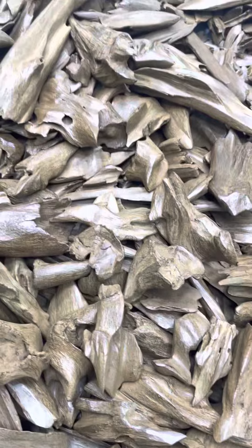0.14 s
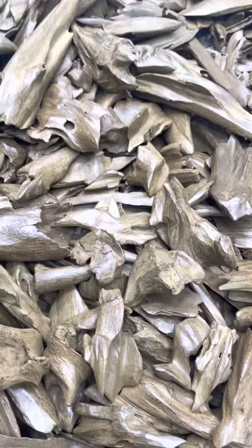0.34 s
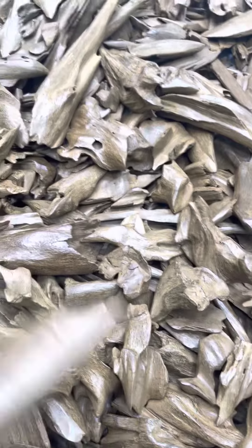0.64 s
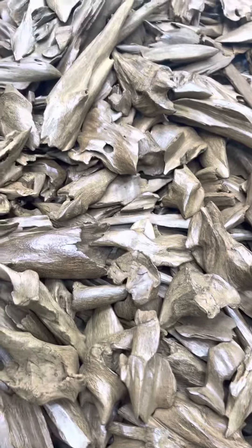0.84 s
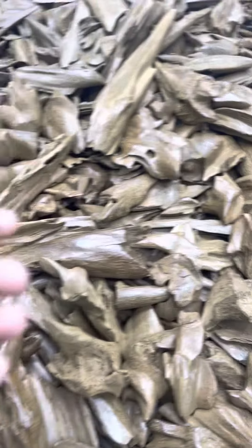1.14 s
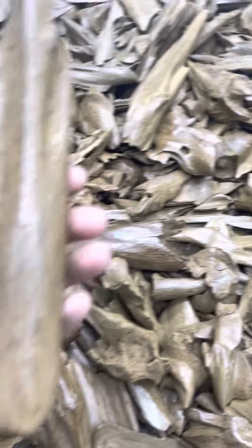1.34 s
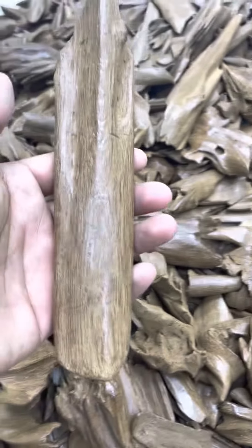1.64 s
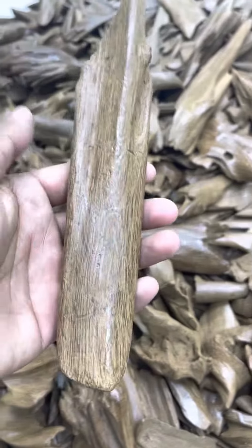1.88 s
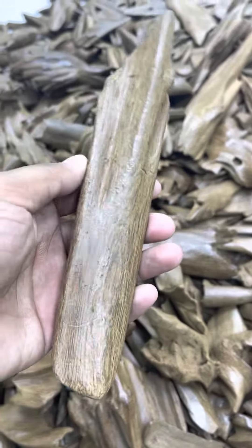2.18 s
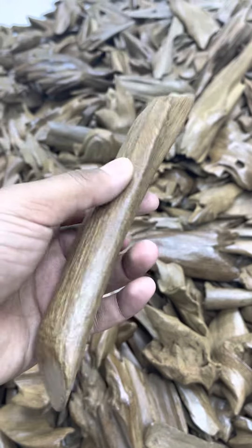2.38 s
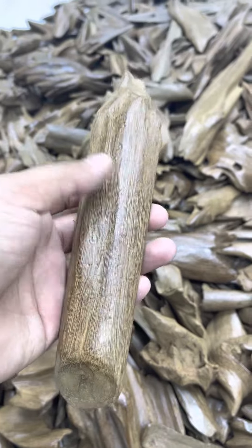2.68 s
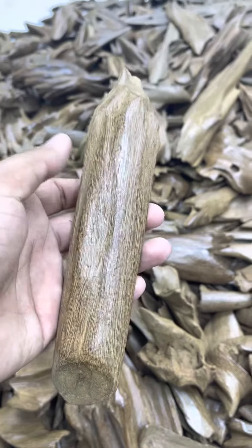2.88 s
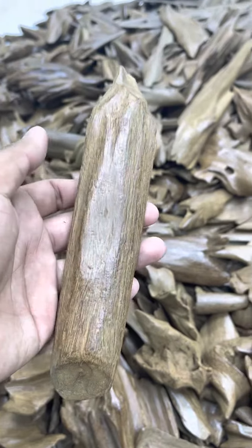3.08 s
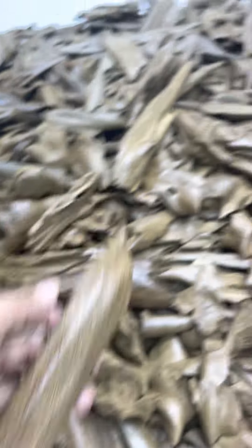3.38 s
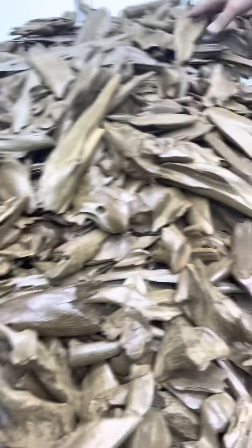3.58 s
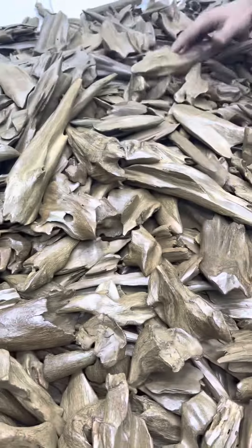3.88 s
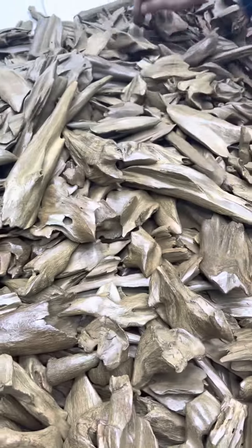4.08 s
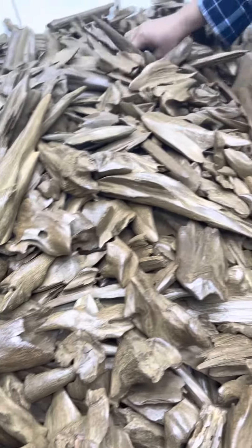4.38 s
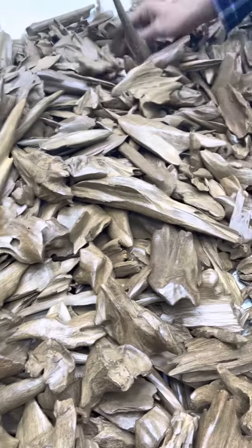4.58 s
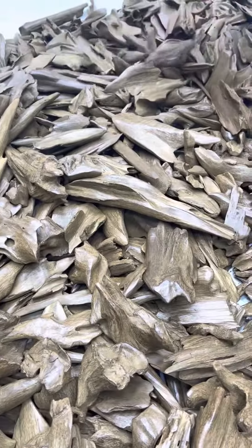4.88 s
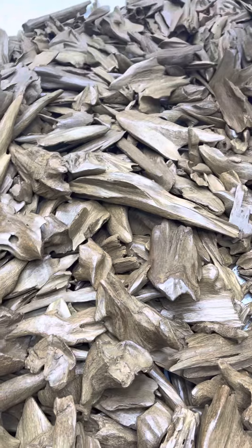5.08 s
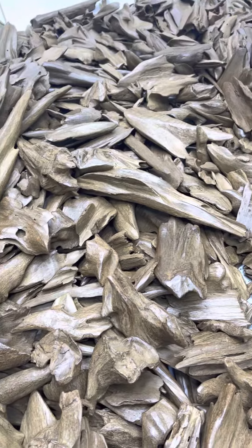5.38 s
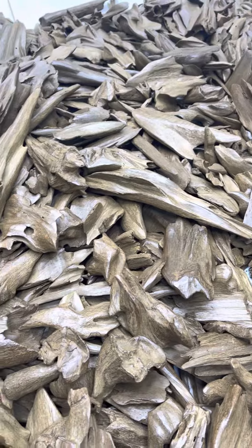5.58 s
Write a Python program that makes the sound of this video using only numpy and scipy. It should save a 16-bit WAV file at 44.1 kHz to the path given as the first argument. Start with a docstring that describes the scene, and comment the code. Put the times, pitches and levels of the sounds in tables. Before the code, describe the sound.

Close indoor handling of dry wood chunks: faint rustling first, then busier clatter, a heavy piece dropped, bright splinter ticks, and sparser knocks.

```python
"""A large heap of dry wood chips, rummaged by hand indoors, close to a pair of microphone ports.
Single pieces clack in three noise registers plus stick modes; a heavy piece drops, bounces and is choked.
With each stroke clicks ring as tumbling chips, catch-and-slip noise scrapes, splinters flick, a stick drags.
Nearest the ports the hand rustles and thumps in the bass as it turns a piece.
Behind it lie low room noise, a wavering hum and a faint diffuse tail."""
import sys
import numpy as np
from scipy import signal
from scipy.fft import rfft, irfft
from scipy.io import wavfile

SR = 44100
rng = np.random.default_rng(int(sys.argv[2]) if len(sys.argv) > 2 else 0)


def unload_wav(signal):
    """Save mono or channel-first audio to the path in sys.argv[1] as 16-bit WAV at rate SR, clipped to [-1, 1]."""
    wavfile.write(
        sys.argv[1],
        SR,
        np.round(np.clip(np.atleast_2d(signal).T, -1, 1) * 32767).astype(np.int16),
    )


N = 252693
TIME, HZ = np.arange(N) / SR, np.fft.rfftfreq(N, 1 / SR)

# Room noise of the quiet interior: [f/Hz, level/dB per Hz]
AIR_SPECTRUM = [(20, 0), (42, 1.5), (70, -3), (120, -2.5), (200, -7.5), (400, -12), (1000, -15.5),
                (4000, -48), (11000, -22.5), (14000, -125)]
# Hum filling the room: [f/Hz, level/dB]
HUM_TONES = [(66, -56.5), (99, -57.5)]
# Reverberation of the room: [f/Hz, t60/s]
ROOM_DECAY = [(200, 0.31), (1500, 0.9), (5000, 0.46), (12000, 0.019)]

# Low rustle of the hand, strongest while it turns a piece close by: [t/s, level/dB]
HAND_LEVEL = [(0, -55), (.5, -52.5), (1.3, -52), (1.6, -49.5), (2.5, -46), (2.9, -54.5), (3.6, -61),
              (5.1, -58), (5.45, -53.5), (5.7, -51)]
# Colour of that rustle: [f/Hz, level/dB per Hz]
HAND_SPECTRUM = [(50, 4), (100, 2), (180, 7.5), (300, 1), (600, -9.5), (2000, -45)]
# Soft thumps as the hand shifts its grip: [t/s, level/dB, starting pitch f/Hz, length/s]
GRIP_THUMPS = [(2.406, -34.5, 120.4, 0.047), (2.474, -40, 104.8, 0.045), (2.549, -39.5, 71, 0.072),
               (2.623, -48, 97, 0.04), (2.696, -49, 67, 0.08), (2.835, -52, 68.5, 0.043)]

# Strokes of the hand through the heap, before build-up and easing:
# [start t/s, length/s, tumbling level/dB, scraping above tumbling/dB]
HAND_STROKES = [(0.117, 0.23, -49.5, -14), (0.227, 0.33, -52, -0.5), (0.31, 0.66, -44, -6),
                (0.808, 0.19, -40.5, -5.5), (1.33, 0.14, -54.5, 11), (1.165, 0.056, -42.5, -1.5),
                (1.421, 0.11, -34.5, 0), (1.556, 0.1, -42, 1.5), (1.726, 0.13, -35, 1.5),
                (1.858, 0.41, -29.5, 4.5), (2.26, 0.1, -36.5, 4.5), (2.41, 0.5, -38, 2.5),
                (2.923, 0.054, -35, -1), (3.027, 0.28, -40, 7.5), (3.554, 0.17, -29, -1.5),
                (3.77, 0.2, -34.5, -0.5), (4.005, 0.44, -35.5, 0.5), (4.241, 0.1, -35.5, 6.5),
                (4.42, 0.22, -37, 0), (4.663, 0.081, -36.5, -0.5), (4.85, 0.064, -38, 0.5),
                (4.9, 0.015, -33.5, -6.5), (5.252, 0.028, -50, 6), (5.615, 0.17, -40, -5)]
# Many small chips knocking together: [f/Hz, level/dB per Hz]
TUMBLE_SPECTRUM = [(100, -44), (300, 0.5), (600, -4), (1000, -1), (1400, 0.5), (1900, 1), (2600, 1),
                   (3500, -13), (5000, -14.5), (9000, -16), (14000, -67)]
# Rough faces rubbing: [f/Hz, level/dB per Hz]
SCRAPE_SPECTRUM = [(100, -20), (300, -13), (800, 2.5), (1500, -0.5), (3000, 3.5), (4200, 1.5), (5200, -3.5),
                   (7500, -5.5), (10200, -9), (11500, -12), (13000, -46), (16000, -48)]
# Splinters flicked by the scraping: [f/Hz, level/dB per Hz]
SPLINTER_SPECTRUM = [(2000, -33), (4300, -6), (6000, 2.5), (8000, 3), (10200, 3.5), (11500, -12),
                     (13000, -47), (16000, -50)]
# Splinter treble against the scraping, before a fixed trim, dull when the hand digs at the far side
# of the heap: [t/s, level/dB]
SPLINTER_TREBLE = [(0, 7), (1.5, -6), (2.3, 0), (3.6, -3), (4.2, 1.5), (4.55, -5.5), (5.7, -3)]
# Single thin splinters that catch and flick free: [t/s, level/dB]
SPLINTER_FLICKS = [(.2515, -40), (1.1738, -38.5), (1.182, -43), (1.2034, -33.5), (1.215, -39), (1.229, -36),
                   (2.4957, -26), (2.509, -24), (2.61, -30), (2.654, -32), (2.761, -28), (3.231, -29),
                   (3.281, -21), (3.644, -34), (4.064, -21), (4.0755, -19.5), (4.103, -28), (4.1188, -12),
                   (4.152, -21.5), (4.2082, -23), (4.2802, -25), (5.1, -41), (5.503, -41)]
# Colour of those single flicks: [f/Hz, level/dB per Hz]
FLICK_SPECTRUM = [(3000, -43), (6000, 2.5), (11000, 3.5), (12700, -23), (15000, -32)]
# Sticks dragged over their neighbours until they ring: [start t/s, length/s, level/dB, ring pitch f/Hz]
STICK_DRAGS = [(.36, 0.18, -49, 1250), (0.922, 0.087, -46, 2096), (3.098, 0.13, -41, 2013),
               (3.838, 0.16, -37, 3030), (4.343, 0.2, -39.5, 1678), (4.552, 0.075, -36.5, 2334),
               (4.589, 0.055, -37, 1298), (4.61, 0.14, -42, 1672), (4.88, .075, -40, 1308),
               (4.957, .1, -39, 941), (5.152, .045, -47, 950)]
# Modes of a stick: [multiple of its ring pitch, level/dB, factor on t60]
STICK_MODES = [(1.002, 3.5, 1), (1.03, -26, 0.31), (1.585, -14, 0.77), (2.66, -6.5, 0.23), (3.14, -45, 0.3)]

# The heavy piece touches, lands and bounces: [t/s, level/dB, factor on t60, tilt/dB per octave]
HEAVY_CONTACTS = [(3.5295, -29, 0.3, 0), (3.5392, -3.5, 0.8, 0), (3.5615, -2, 0.45, -1.5),
                  (3.5654, -4, 0.17, -3)]
# Its modes, before tilt and factor on t60: [f/Hz, level/dB, t60/s]
HEAVY_MODES = [(390, -28, 0.02), (700, 0.5, 0.015), (980, -9, 0.018), (1576, 0, 0.022), (1786, -6.5, 0.09),
               (2880, -2.5, 0.034), (3900, -20.5, 0.13), (5200, -18, 0.03), (5970, -12, 0.022),
               (7100, -7, 0.015), (8150, -12, 0.035), (10000, -4.5, 0.0087)]

# Clear clacks, before the trims of each register and of the stick modes:
# [t/s, strength level/dB, sharpness/dB (thin edge high, flat face low), burst decay/s,
#  ring above strength/dB, ring pitch f/Hz, ring t60/s]
CLEAR_CLACKS = [(0.364, -37.5, -19, 0.0025, -5, 2300, 0.06), (0.4458, -43.5, 2, 0.008, 0, 1230, 0.052),
                (0.5132, -35.5, -13, 0.002, 15, 1360, 0.01), (0.5752, -45.5, 1, 0.014, 2, 2230, 0.052),
                (0.7012, -51.5, -27, 0.0035, 17, 1980, 0.029), (0.7676, -47, -28, 0.023, 4, 2070, 0.036),
                (0.832, -38, -12, 0.013, -1, 1630, 0.02), (0.905, -36, -4.5, .0015, 2, 4000, 0.02),
                (0.9292, -42, -10, .003, 1, 1760, .03), (1.0167, -46.5, -23, 0.0026, 7.5, 1860, .04),
                (1.067, -40, -7, 0.0041, 2, 2220, 0.027), (1.082, -36.5, -9, 0.0013, -1, 2480, 0.026),
                (1.251, -43, 12, 0.0034, -2, 6360, .02), (1.269, -41, 4, 0.01, 0, 2500, .02),
                (1.4422, -39, -1, 0.0045, 7, 3320, 0.022), (1.7878, -31, 2.5, 0.0041, 3.5, 2896, 0.028),
                (1.9256, -29, 6.5, 0.015, 2, 2770, 0.029), (1.9633, -30, -4, .003, 5, 3600, 0.028),
                (2.2914, -32.5, 12, 0.0058, -2, 1290, 0.04), (2.592, -38, 9, 0.0034, 11.5, 6480, 0.027),
                (2.6224, -29.5, -6, 0.001, 6, 1710, 0.01), (2.674, -37, -10, .003, 5, 2900, .02),
                (2.7368, -27.5, 2, 0.0069, 1, 1670, 0.029), (2.8495, -28.5, -3.5, 0.0084, 3, 1620, 0.028),
                (2.884, -36, -10, 0.0076, 12, 1690, 0.021), (2.9565, -27, -5.5, 0.0033, 5.5, 1030, 0.017),
                (3.0095, -33.5, 2.5, 0.03, 2, 2800, .02), (3.082, -34, 1, 0.0067, 2, 910, 0.018),
                (3.0878, -28, -11, 0.0054, -1, 2010, 0.06), (3.0983, -22, 0.5, 0.0055, 3.5, 5960, 0.025),
                (3.1291, -26, 3, 0.023, -1.5, 2750, 0.07), (3.2192, -24, -2, 0.014, -6, 2680, .025),
                (3.232, -31, 0, 0.005, 6, 6150, .02), (3.2751, -26.5, 4.5, 0.0077, -13, 5970, 0.027),
                (3.563, -26.5, -3, 0.0058, 7, 2290, 0.044), (3.581, -32, 3, 0.0033, -6, 6960, .02),
                (3.616, -33, 4, 0.0065, 5, 6940, 0.03), (3.6296, -23.5, -14, 0.0069, -5, 1790, 0.031),
                (3.642, -27.5, 8, 0.0049, -4, 1800, .022), (3.6832, -25, -1.5, 0.0062, 4, 2380, 0.019),
                (3.7842, -31.5, -13, 0.017, 1.5, 2660, 0.068), (3.798, -26, -9, 0.011, 2.5, 1995, 0.032),
                (3.8424, -38, -13, 0.0044, 9, 3100, 0.038), (3.8702, -38, -10, 0.0046, 12, 2920, 0.026),
                (3.885, -30, 6.5, 0.0078, 4, 3270, 0.026), (3.896, -29.5, 5, 0.0045, -3, 3940, 0.049),
                (4.0393, -31, 7.5, 0.0035, -5, 1980, 0.055), (4.097, -33, 6, 0.0033, 1, 1570, 0.028),
                (4.1026, -34, 2, 0.0029, 4, 2230, 0.026), (4.119, -26.5, 10.5, 0.0049, -4.5, 6030, 0.032),
                (4.159, -33.5, -1, 0.0031, 10, 1770, 0.097), (4.2004, -30.5, -5, 0.0088, 2, 1777, 0.089),
                (4.29, -25, 1, 0.0099, -2.5, 3690, 0.045), (4.3058, -23, -2, 0.0024, -1, 2680, .02),
                (4.3255, -23, 1.5, 0.011, -9.5, 1629, 0.21), (4.344, -28, -9, 0.0055, -13, 1670, .03),
                (4.524, -30, -8, 0.0026, 1.5, 2310, 0.083), (4.5935, -30.5, 8, 0.0046, 0, 2200, .04),
                (4.6412, -31.5, -2, 0.0079, 2.5, 3510, 0.045), (4.7142, -30, 0.5, 0.0036, -9, 2270, .03),
                (4.7344, -34, 2, .004, -3, 4040, 0.052), (4.759, -34.5, -8, 0.013, -1, 2600, 0.033),
                (4.837, -31.5, 4, 0.0029, -6, 2700, .015), (4.8677, -36.5, -29, 0.006, -4, 1298, 0.14),
                (5.0054, -33.5, -13, 0.0011, 6.5, 2880, 0.018), (5.029, -39, -10, 0.003, 4, 2920, 0.04),
                (5.07, -51, -28, .004, -21, 2170, 0.034), (5.153, -45, 8, 0.0041, 0, 3040, 0.044),
                (5.168, -53, -22, 0.0024, 16, 2950, .03), (5.199, -50.5, -31, 0.0016, 15.5, 950, 0.017),
                (5.32, -44.5, -22, .005, 6.5, 1940, 0.043), (5.3301, -37, -16, 0.0045, 1, 2310, 0.051),
                (5.366, -42, 2, 0.0035, 4, 650, 0.022), (5.3894, -31.5, -5, 0.0038, -3, 2540, 0.016),
                (5.422, -40, -2, 0.0045, 4, 690, 0.018), (5.4281, -25.5, -6, 0.0046, -4.5, 2245, 0.033),
                (5.4491, -29, -14.5, 0.0045, -10, 3400, .013),
                (5.473, -34.5, -5.5, 0.0062, 0.5, 650, 0.023), (5.509, -40.5, -22, 0.0028, 4, 1760, 0.017),
                (5.5228, -36, -10, 0.0074, -1.5, 700, 0.037), (5.632, -40, -6, .003, -2, 2020, .02),
                (5.6607, -37.5, -0.5, 0.0033, 5, 1935, .034), (5.6708, -40.5, -38, 0.0025, 11, 725, 0.024),
                (5.713, -35.5, -11, 0.0088, 0, 677, 0.04)]
# Push on the heap: [f/Hz, level/dB per Hz]
THUD_SPECTRUM = [(60, -23), (200, -9), (430, -2), (720, 7), (1100, 5), (1700, 6), (4000, -51)]
# Crack of the wood: [f/Hz, level/dB per Hz]
CRACK_SPECTRUM = [(500, -37), (1100, -4.5), (1700, -1.5), (2700, 6), (4200, 2), (5500, -4), (12000, -81)]
# Snap of thin edges: [f/Hz, level/dB per Hz]
SNAP_SPECTRUM = [(2000, -54), (4300, -1), (6000, -0.5), (8000, 2.5), (10200, 2), (11800, -18), (13000, -45),
                 (16000, -43)]

# Likeness of the two microphone ports: [f/Hz, likeness from 0 to 1]
PORT_LIKENESS = [(100, 1), (400, 0.97), (800, 0.61), (1300, 0.76), (1800, 1), (2400, 0.64), (3100, 0.11),
                 (3900, 0.77), (5000, 0.8), (6000, 0.98), (7200, 0.84), (9200, 1), (11000, 0.76)]
# Phase by which the left port leads, before it fades out in the bass: [f/Hz, lead/rad]
PORT_LEAD = [(300, -.1), (800, -.25), (1500, 0), (2200, .2), (2600, .9), (4100, .95), (4650, 2.3),
             (5250, 5.1), (5700, 6.2), (6200, 6.4), (8500, 9.3), (9600, 9.5), (11800, 12.5)]

HUM_WAVER = 0.4  # rms share by which the hum swells and sinks
# A stroke builds up, eases off as the chips give way, then the heap settles.
PUSH_S, EASE_DB_PER_S, SETTLE_DB_PER_S = 0.096, 7.5, 69
CREEP_DB, CREEP_SCRAPE_DB = -91, -62.5  # chips creep faintly between strokes
DRAG_RING_CYCLES = 115  # cycles for a 60 dB fall, before each mode's factor
THUD_PER_SHARP = 0.55  # dB of thud lost per dB of sharpness: a thin edge pushes the heap less
# Ports: bass heard in step, lower and upper roll-off, band limit
MONO_HZ, LOW_HZ, TOP_HZ, EDGE_HZ = 400, 35, 13400, 15600


def gain_of(db):
    """Decibels to amplitude."""
    return 10 ** (np.asarray(db) / 20)


def evened(x):
    """Scales to an rms of one."""
    return x / np.sqrt(np.mean(x ** 2) + 1e-20)


def read(points, hz):
    """Reads a table on a log-frequency axis."""
    f, value = np.transpose(points)
    return np.interp(np.log(hz + 1), np.log(f + 1), value)


def follow(rows):
    """Each column of a curve, at every sample."""
    s, *columns = np.transpose(rows)
    return [np.interp(TIME, s, column) for column in columns]


def add(mix, s, sound):
    """Mixes a sound in at a time in seconds."""
    part = mix[:, max(round(s * SR), 0):][:, :sound.shape[-1]]
    part += sound[..., :part.shape[1]]


def waver(rate_hz):
    """Slow chance with an rms of one."""
    return evened(irfft(rfft(rng.standard_normal(N)) * np.exp(-(HZ / rate_hz) ** 2), N))


def colour(pair, spectrum):
    """Gives two unrelated signals a spectrum and the likeness of the two ports."""
    common, apart = rfft(pair) * gain_of(read(spectrum, HZ))
    same = np.clip(read(PORT_LIKENESS, HZ), 0, 1)
    mid = common * np.sqrt(1 + same)
    side = apart * np.sqrt(1 - same)
    return evened(irfft([mid + side, mid - side], N))


def noise(spectrum):
    """Steady noise at both ports."""
    return colour(rng.standard_normal((2, N)), spectrum)


def contacts(per_s, spread_db):
    """Random clicks as surfaces touch: many small, a few large unless the spread is zero."""
    size = gain_of(spread_db * np.minimum(rng.exponential(1, N), 3.5))
    return size * (rng.random(N) < per_s / SR)


def chips(hits, low_hz, high_hz, t60, tick, count=40):
    """Shares clicks among many chips; each ticks and rings for a moment at four pitches of its own."""
    chip, t = rng.integers(0, count, N), np.arange(SR // 8) / SR
    out = np.zeros((2, N))
    pitches = rng.permutation(np.linspace(low_hz, high_hz, 4 * count)).reshape(count, 4)
    ring_times = t60 * rng.uniform(.5, 1.6, count)
    for k, (modes, lasting) in enumerate(zip(pitches, ring_times)):
        ring = 0
        for hz in modes:
            phase = rng.uniform(0, 2 * np.pi, (2, 1))
            ring = ring + np.sin(2 * np.pi * hz * t + phase)
        ring = ring * gain_of(-60 * t / lasting)
        crack = rng.standard_normal((2, len(t))) * np.exp(-t / 0.0015)
        one_chip = evened(ring) + tick * evened(crack)
        own_hits = hits * (chip == k)
        out += signal.oaconvolve(own_hits[None], one_chip, axes=1)[:, :N]
    return out


def background(air_db=-49):
    """Low room noise behind the heap, and hum tones that waver in level and phase."""
    hum = 0
    for hz, db in HUM_TONES:
        drift = waver(5.1)
        tone = (1 + HUM_WAVER * drift) * np.sin(2 * np.pi * hz * TIME + drift)
        hum = hum + gain_of(db) * evened(tone)
    return gain_of(air_db) * noise(AIR_SPECTRUM) + hum


def room(x, wet_db=-15):
    """A faint diffuse tail whose treble dies first: noise decaying band by band."""
    burst = noise([(100, 0), (12000, 0)])[:, :SR // 2]
    hz, t, z = signal.stft(burst, SR, nperseg=256)
    decay = gain_of(-60 * t / read(ROOM_DECAY, hz)[:, None])
    z = z * decay * (1 - np.exp(-t / 0.0019))  # the tail builds up softly
    tail = signal.istft(z, SR, nperseg=256)[1]
    tail = tail / np.linalg.norm(tail[0])
    return gain_of(wet_db) * signal.fftconvolve(x.mean(0)[None], tail, axes=1)[:, :N]


def rustle():
    """The hand's low rustle close to the ports: bass-heavy noise that follows its handling."""
    return gain_of(follow(HAND_LEVEL)[0]) * noise(HAND_SPECTRUM)


def thumps(sag_per_s=2.0, rough=0.33):
    """Soft, uneven low bumps as the hand shifts its grip; each swells, sags in pitch and dies."""
    out, t = np.zeros((2, N)), np.arange(SR // 3) / SR
    for s, db, hz, length in GRIP_THUMPS:
        wobble = rough * waver(70)[:len(t)]
        drift = rough * waver(70)[:len(t)]
        u = (2 * t / length) ** 2
        swell = np.sqrt(2 * u) * np.exp(1 - np.sqrt(u))  # fullest at half the length
        turns = np.cumsum(hz * np.exp(-sag_per_s * t)) / SR
        tone = np.sin(2 * np.pi * turns + drift)
        add(out, s, gain_of(db) * swell * (1 + wobble) * tone)
    return out


def motion(start, length, db):
    """Amplitude of one stroke: it builds up, eases off and dies away."""
    t = np.maximum(TIME - start, 0)
    settling = SETTLE_DB_PER_S * np.maximum(t - length, 0)
    return np.minimum(t / PUSH_S, 1) * gain_of(db - EASE_DB_PER_S * t - settling)


def strokes():
    """Levels in dB of tumbling and of scraping, powers summed over all strokes."""
    tumble, scrape = gain_of(CREEP_DB) ** 2, gain_of(CREEP_SCRAPE_DB) ** 2
    for start, length, db, scrape_db in HAND_STROKES:
        power = motion(start, length, db) ** 2
        tumble = tumble + power
        scrape = scrape + power * gain_of(scrape_db) ** 2
    return 10 * np.log10(tumble), 10 * np.log10(scrape)


def scraping(level_db, rub_db=0.0, splinter_db=-4):
    """Rough faces catch and slip in tiny bursts, and flick thin splinters."""
    slip_s, smooth = .0022, .45
    catches = contacts(per_s=980, spread_db=0.0) ** 2
    slips = signal.lfilter([1], [1, -np.exp(-2 / (slip_s * SR))], catches)
    grip = np.sqrt(slips / slips.mean() + smooth ** 2)
    rub = colour(grip * rng.standard_normal((2, N)), SCRAPE_SPECTRUM)
    snaps = contacts(per_s=600, spread_db=4.0)
    ticks = chips(snaps, low_hz=3500, high_hz=12000, t60=.016, tick=1.0)
    splinters = colour(ticks, SPLINTER_SPECTRUM)
    treble = gain_of(splinter_db + follow(SPLINTER_TREBLE)[0])
    return gain_of(level_db) * (gain_of(rub_db) * rub + treble * splinters)


def tumbling(level_db, trim_db=0):
    """Small chips knock together as the heap shifts; their neighbours damp them at once."""
    hits = contacts(per_s=400, spread_db=4.2)
    knocks = chips(hits, low_hz=550, high_hz=5200, t60=.02, tick=.9, count=30)
    return gain_of(level_db + trim_db) * colour(knocks, TUMBLE_SPECTRUM)


def flicks(rise_s=0.00055, decay_s=0.0029):
    """Each splinter catches and flicks free with one thin, bright tick of noise."""
    out, t, grain = np.zeros((2, N)), np.arange(SR // 25) / SR, noise(FLICK_SPECTRUM)
    shape = (1 - np.exp(-t / rise_s)) * np.exp(-t / decay_s)
    for s, db in SPLINTER_FLICKS:
        tick = grain[:, round(s * SR):][:, :len(t)] * shape
        add(out, s, gain_of(db) * evened(tick) / evened(shape).max())
    return out


def dragging():
    """A stick is dragged over the chips; the small bumps keep its modes ringing unevenly."""
    out, t = np.zeros((2, N)), np.arange(SR // 4) / SR
    bumps = contacts(per_s=450, spread_db=2.0) * rng.choice([-1, 1], N)
    for start, length, db, hz in STICK_DRAGS:
        t60 = DRAG_RING_CYCLES / hz
        ring = 0
        for multiple, mode_db, lasting in STICK_MODES:
            decay = gain_of(mode_db - 60 * t / (t60 * lasting))
            ring = ring + decay * np.sin(2 * np.pi * hz * multiple * t)
        drive = bumps[round(start * SR):][:round(length * SR)]
        drive = drive * np.linspace(1, .5, len(drive))  # the pull eases as the stick comes free
        sound = signal.fftconvolve(drive, ring)
        add(out, start, gain_of(db) * sound / (sound[:len(drive)].std() + 1e-9))
    return out


def drop(tick_db=-20, crunch_db=-13, skew=0.72, lowest_hz=200, push_db=-15):
    """The heavy piece rings freely at first; the heap crunches under it and damps it as it settles."""
    out, t = np.zeros((2, N)), np.arange(SR // 4) / SR
    rise_s, tick_s, crunch_s, push_s, choke_s = .0008, .0022, .002, .002, .0025
    grit, heap, push = noise(SNAP_SPECTRUM), noise(CRACK_SPECTRUM), noise(THUD_SPECTRUM)
    for s, level_db, lasting, tilt_db in HEAVY_CONTACTS:
        out = out * np.exp(-np.maximum(TIME - s, 0) / choke_s)  # a new contact chokes the earlier ring
        part = slice(round(s * SR), round(s * SR) + len(t))
        sound = gain_of(tick_db) * grit[:, part] * np.exp(-t / tick_s)
        sound = sound + gain_of(crunch_db) * heap[:, part] * np.exp(-t / crunch_s)
        push_gain = gain_of(push_db - tilt_db / 2)  # flat landings push the heap harder
        sound = sound + push_gain * push[:, part] * np.exp(-t / push_s)
        for hz, db, t60 in HEAVY_MODES:
            phase = skew * (2 * rng.random((2, 1)) - 1)  # each mode radiates its own way
            tilted_db = db + tilt_db * np.log2(hz / 1800)
            decay = gain_of(tilted_db - 60 * t / (t60 * lasting))
            sound = sound + decay * np.sin(2 * np.pi * hz * t + phase)
        add(out, s, gain_of(level_db) * sound * (1 - np.exp(-t / rise_s)))
    highpass = signal.butter(2, lowest_hz, "highpass", fs=SR, output="sos")
    return signal.sosfilt(highpass, out)  # the drop keeps little bass below its lowest pitch


def clacks(crack_db=-1, thud_db=-10, snap_db=-1, ring_db=6, thud_share=0.55, snap_share=0.64,
           rise_s=0.0013, settle_db=-23, settle_s=0.046, graze_db=-17, graze_s=.0012, ripple_db=4.5):
    """A piece grazes its neighbour, strikes with a short burst in three registers, and rings
    unevenly as it rocks."""
    lead, size = SR // 50, 16384  # samples before the blow, and in all
    out, t = np.zeros((2, N)), (np.arange(size) - lead) / SR
    after, bins = np.maximum(t, 0), np.fft.rfftfreq(size, 1 / SR)
    attack = 1 - np.exp(-after / rise_s)
    blow = slice(lead, lead + SR // 200)  # the blow itself lasts 5 ms
    graze = gain_of(graze_db) * np.exp(-abs(t) / graze_s)
    settle = gain_of(settle_db) * np.exp(-after / settle_s)  # neighbours rattle on
    registers = [(noise(CRACK_SPECTRUM), crack_db, 1), (noise(THUD_SPECTRUM), thud_db, thud_share),
                 (noise(SNAP_SPECTRUM), snap_db, snap_share)]
    rocking = .2 * waver(90)
    chatter = gain_of(3.5 * waver(450))  # rough edges touch several times in one blow
    chance = rng.random((len(CLEAR_CLACKS), 2, len(STICK_MODES)))
    shapes = rng.uniform(-1, 1, (len(CLEAR_CLACKS), 48))
    for row, (phases, sides), shape in zip(CLEAR_CLACKS, chance, shapes):
        s, strength_db, sharp_db, burst_s, ringing_db, hz, t60 = row
        blows = strength_db + sharp_db * np.array([0, -THUD_PER_SHARP, 1])  # crack, thud, snap
        start, sound = int(phases[0] * (N - size)), 0
        part = slice(start, start + size)
        # every piece has its own colour
        ripple = np.interp(bins, np.geomspace(400, 14000, len(shape)), shape)
        body = gain_of(ripple_db * evened(ripple))
        for blow_db, (grain, trim_db, share) in zip(blows, registers):
            envelope = graze + attack * (np.exp(-after / (burst_s * share)) + settle)
            burst = irfft(rfft(grain[:, part]) * body) * envelope * chatter[part]
            sound = sound + gain_of(blow_db + trim_db) * burst / burst[:, blow].std()
        ring_gain = gain_of(strength_db + ringing_db + ring_db)
        ringing = attack * (1 + rocking[part]) * ring_gain
        for (multiple, db, lasting), phase, side in zip(STICK_MODES, phases, sides):
            mode_hz = hz * multiple
            skew = np.array([[.6], [-.6]]) * (side - .5)  # each mode radiates its own way
            # modes from a quarter of the sample rate up are left out
            mode = np.sin(2 * np.pi * (mode_hz * t + phase) + skew) * (mode_hz < SR / 4)
            sound = sound + ringing * mode * gain_of(db - 60 * after / (t60 * lasting))
        add(out, s + t[0], sound)
    return out


def scene():
    """The heap in its room, with the hand close to the ports."""
    tumble_db, scrape_db = strokes()
    moving = scraping(scrape_db) + tumbling(tumble_db) + dragging()
    wood = moving + flicks() + drop() + clacks()
    return background() + room(wood) + rustle() + thumps() + wood


def record(dry):
    """The ports hear the bass alike and the treble out of step; peaks round off, both ends fall
    away, then the band limit."""
    lead = read(PORT_LEAD, HZ) * (1 - np.exp(-(HZ / MONO_HZ) ** 2))
    ports = irfft(rfft(dry) * np.exp(.5j * lead * np.array([[1], [-1]])), N)
    ports = ports / (1 + (ports / .88) ** 6) ** (1 / 6)
    passband = (1 - np.exp(-(HZ / LOW_HZ) ** 4)) / np.sqrt(1 + (HZ / TOP_HZ) ** 24)
    ports = irfft(rfft(ports) * passband, N)
    band_limit = signal.firwin(511, EDGE_HZ, window=("kaiser", 9), fs=SR)
    return signal.oaconvolve(ports, band_limit[None], "same")


dry = scene()
out = record(dry)
unload_wav(out)
```